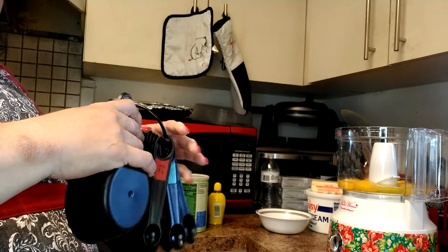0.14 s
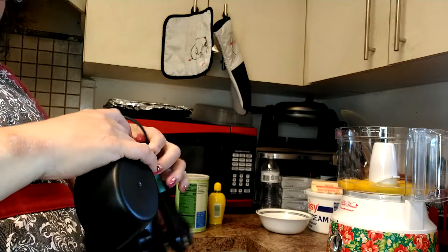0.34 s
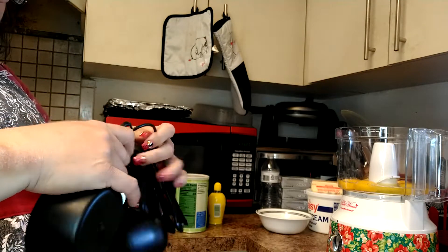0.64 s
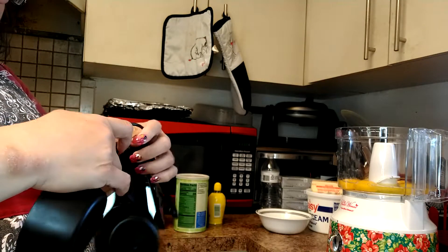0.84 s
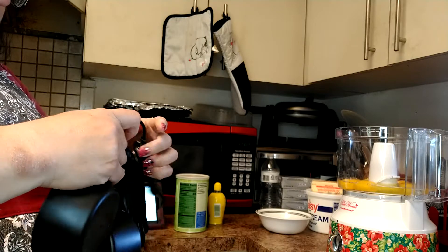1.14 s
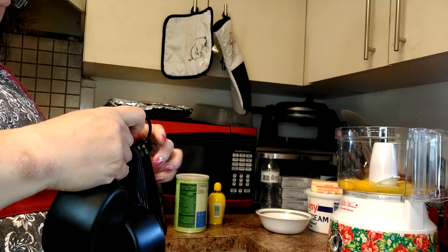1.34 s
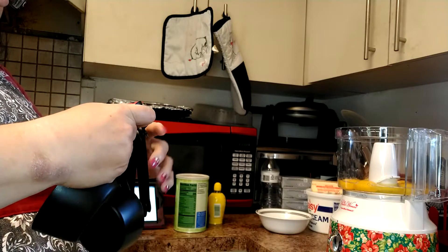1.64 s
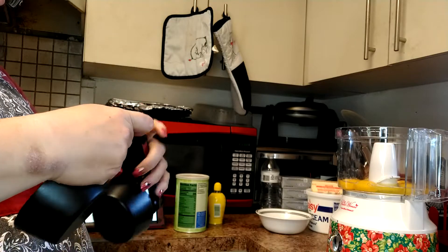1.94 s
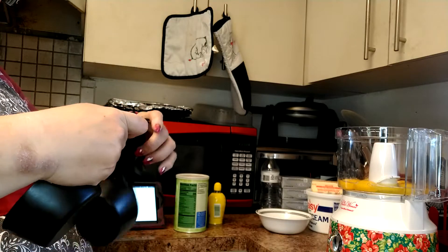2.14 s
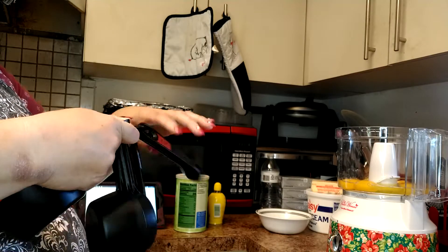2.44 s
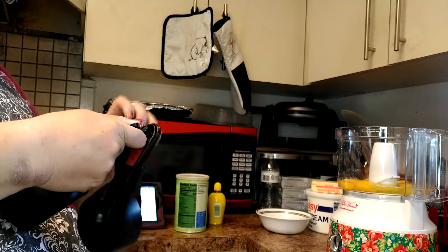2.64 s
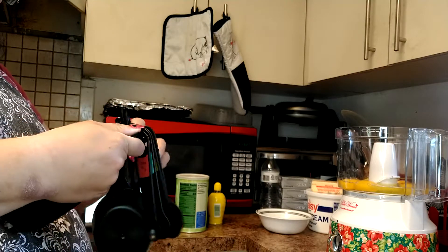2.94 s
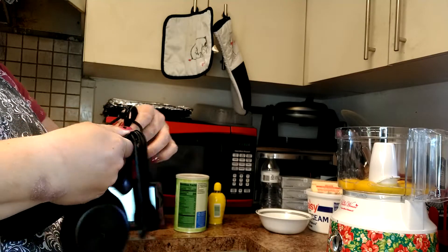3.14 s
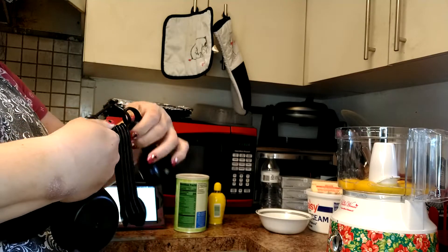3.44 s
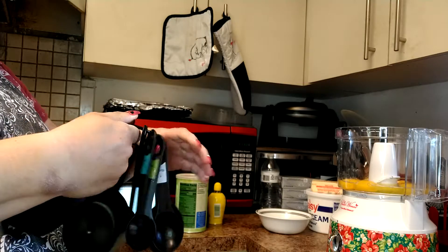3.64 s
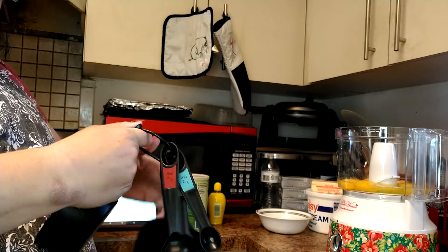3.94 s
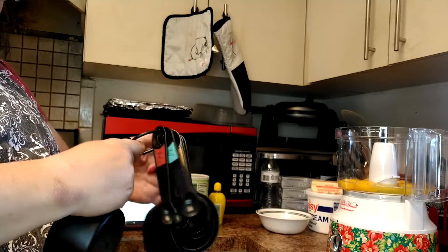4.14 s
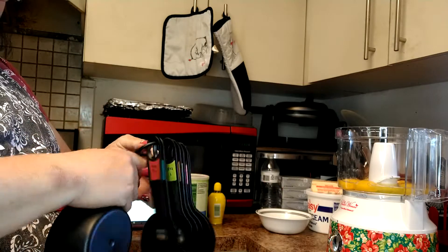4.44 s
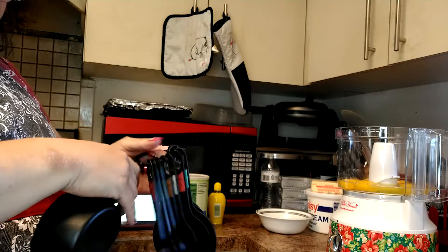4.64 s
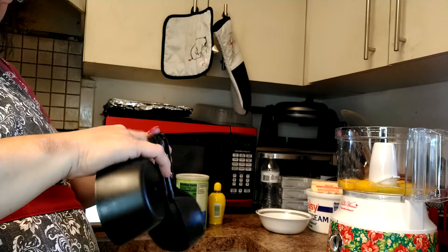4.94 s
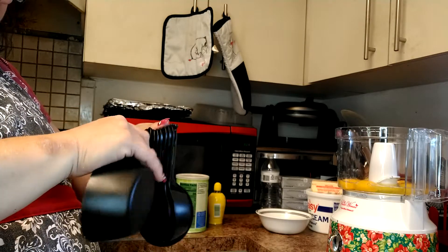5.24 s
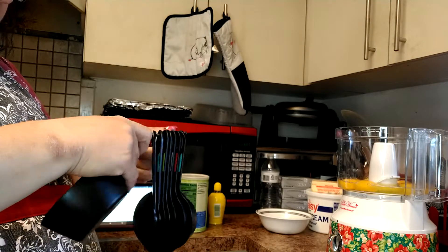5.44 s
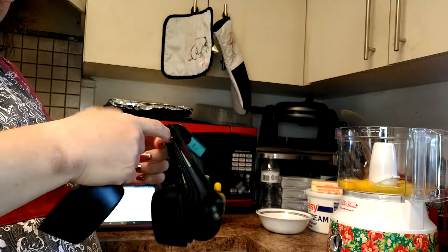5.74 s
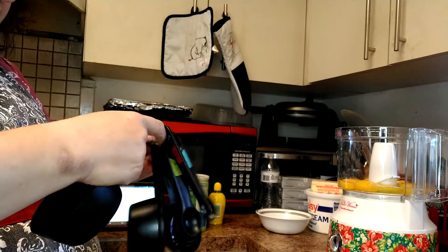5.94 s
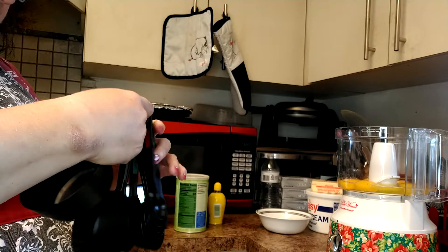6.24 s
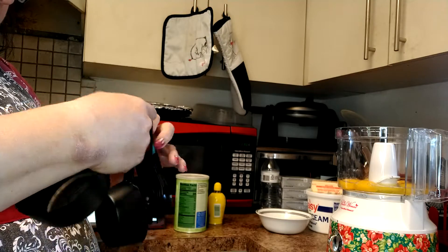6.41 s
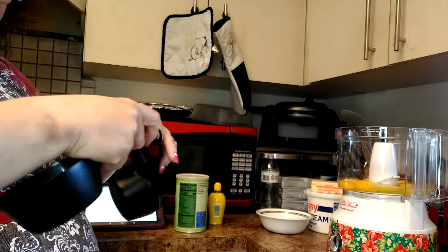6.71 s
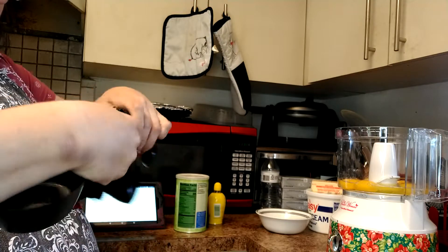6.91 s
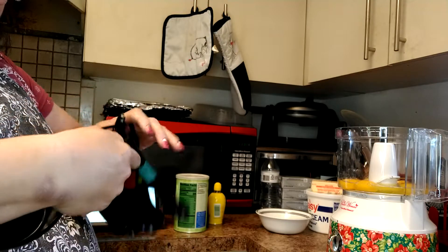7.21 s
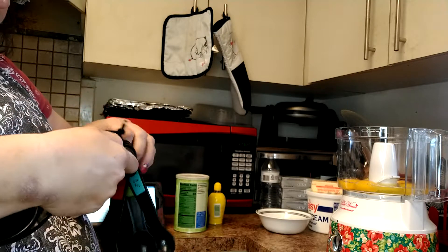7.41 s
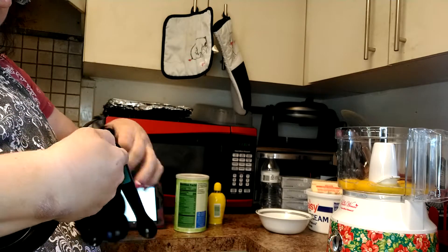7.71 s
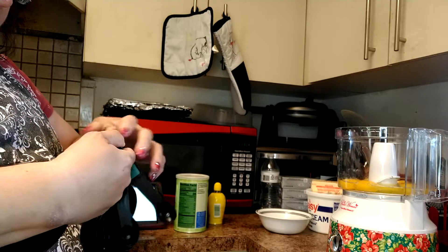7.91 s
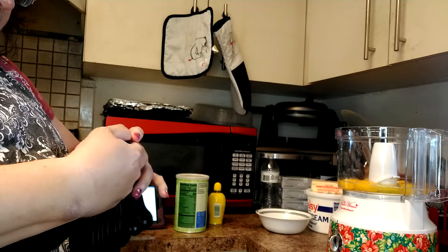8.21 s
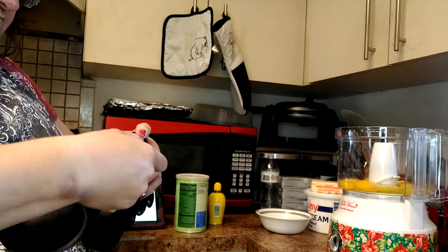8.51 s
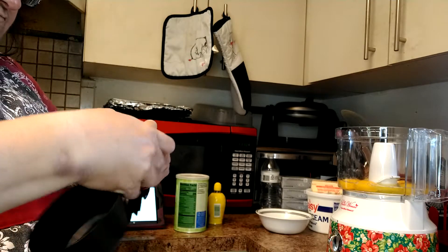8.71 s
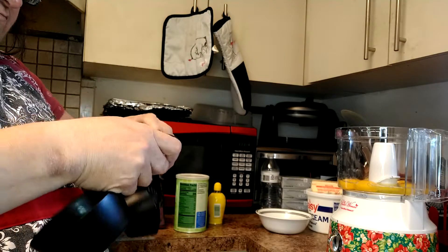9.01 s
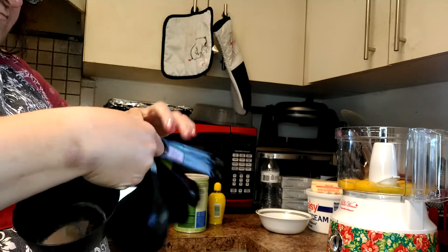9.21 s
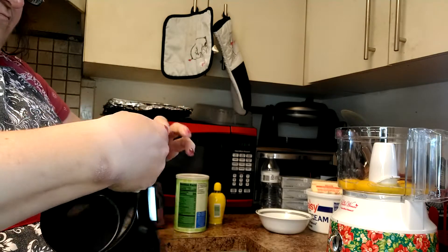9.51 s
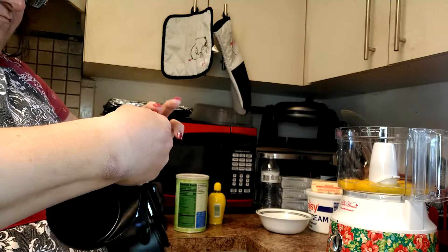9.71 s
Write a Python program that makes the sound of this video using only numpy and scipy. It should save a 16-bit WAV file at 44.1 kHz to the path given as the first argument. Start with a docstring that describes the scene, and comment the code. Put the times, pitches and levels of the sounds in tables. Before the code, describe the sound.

Close to a stereo microphone in a hard kitchen, hands sort a bunch of plastic measuring cups and spoons. Hollow cup knocks and bright handle ticks begin at once, thin out, then thicken into busy clattering. After some sparse, soft touches comes a sharp final flurry. Each blow is short and dry, followed by tiny chatter and close reflections, above quiet room hush and faint distant rumble.

```python
"""Close by, a bunch of plastic measuring cups and spoons on a ring is turned over by hand above a counter.
Bowls knock hollowly, handles and spoons tick: each blow rings short plastic modes and leaves its neighbours
chattering, and random small touches rattle between as the hands move. The hard kitchen answers with near echoes
and a short noise tail. Below lie the room's hush, banded noise, a low rumble from far off that swells and
fades, and a broad low roar, partly from the handling."""
import sys
import numpy as np
from scipy import signal
from scipy.io import wavfile

SR = 44100
rng = np.random.default_rng(int(sys.argv[2]) if len(sys.argv) > 2 else 0)


def persist_wave(psi):
    """Save psi, clipped to +-1, as 16-bit WAV."""
    counts = np.round(np.clip(psi, -1, 1) * 32767).astype(np.int16)
    wavfile.write(sys.argv[1], SR, np.atleast_2d(counts).T)


N = 434826


def cups():
    """All blows on the bunch; things this small and light send out no bass."""
    # Bowl against bowl. Each row: start in seconds, level in dB, centre of the ring in Hz,
    # share of the biggest cup in dB against the knock.
    bowl_knocks = [(0.0024, -26.5, 1680, -7.5), (0.0259, -26.5, 1650, -2.5), (0.1331, -41, 2100, -11),
                   (0.307, -47, 1340, -14), (0.382, -37.5, 1480, -5), (0.4635, -36.5, 1410, -15),
                   (0.4798, -22.5, 1490, -13.5), (0.5291, -23, 1640, -22), (0.7212, -50, 1414, -12),
                   (0.7606, -35.5, 2190, -20), (0.887, -33.5, 1340, -31), (0.9202, -33.5, 1510, -6.5),
                   (1.024, -33.5, 1540, -29), (1.0986, -45, 1600, -9), (1.1712, -42, 1430, -16),
                   (1.2389, -27, 1560, -13), (1.4757, -39, 1530, -6.5), (1.8144, -32, 1560, -25),
                   (1.8597, -32.5, 1460, -10), (2.224, -25, 1960, -25), (2.3057, -28.5, 1990, -17),
                   (2.3323, -12.5, 1490, -13), (2.4777, -22.5, 1770, -23), (2.5715, -25, 1410, -17.5),
                   (2.6467, -37.5, 1490, -21), (2.7064, -41, 1680, -30), (2.773, -16, 1370, -13),
                   (2.8337, -27, 1610, -10.5), (2.9454, -29, 1760, -18.5), (2.9866, -30, 1440, -19),
                   (3.0063, -23.5, 1400, -11), (3.0334, -23.5, 1380, -16), (3.1497, -30, 1480, -14),
                   (3.3395, -34, 1850, -20), (3.3718, -34, 1420, -21), (3.6311, -39.5, 1990, -29),
                   (3.6611, -28, 1880, -25), (3.702, -27, 2280, -23), (3.7251, -24, 1850, -33),
                   (3.7648, -18, 1830, -44), (3.7924, -16, 1700, -35), (3.902, -26.5, 1500, -27),
                   (3.915, -18, 1880, -33), (3.992, -31.5, 1340, -14), (4.0412, -15, 1460, -20.5),
                   (4.0658, -33, 1510, -38), (4.0953, -32, 1310, -17), (4.1189, -30, 1490, -7.5),
                   (4.1944, -28, 1510, -6), (4.2168, -20.5, 1450, -13), (4.2382, -13, 1500, -18.5),
                   (4.391, -30.5, 1520, -21), (4.437, -27, 1490, -13), (4.5153, -38, 1430, -2),
                   (4.556, -32, 1410, -19), (4.68, -30.5, 1700, -9), (4.7175, -33.5, 1570, -16),
                   (4.7672, -31, 1520, -15), (4.8004, -22.5, 1500, -16), (4.8247, -27, 1720, -31),
                   (4.8442, -14, 1830, -20), (4.9142, -37, 1530, -7), (4.992, -23.5, 1780, -21.5),
                   (5.0378, -34.5, 1810, -25), (5.0805, -23, 1770, -32), (5.1615, -16, 1580, -19),
                   (5.2257, -25, 1660, -44), (5.2826, -23.5, 1640, -31), (5.3312, -27, 1640, -13.5),
                   (5.448, -30, 1580, -24), (5.5024, -33, 1580, -21), (5.5428, -31.5, 1730, -22),
                   (5.5874, -33.5, 1550, -31), (5.687, -26, 1580, -21), (5.7342, -26.5, 1590, -23),
                   (5.7718, -35, 1630, -27), (6.066, -39, 1640, -22), (6.2096, -35.5, 1850, -27),
                   (6.2749, -35, 1880, -32), (6.2951, -26.5, 1850, -24.5), (6.413, -27, 1690, -20.5),
                   (6.6574, -35, 1670, -30), (6.7543, -23.5, 1714, -40), (6.9238, -37.5, 1350, -26),
                   (6.987, -34.5, 1340, -33), (7.0935, -33, 1600, -16.5), (7.212, -32, 1830, -29),
                   (7.226, -29.5, 1830, -29), (7.3081, -27.5, 1800, -22), (7.3206, -27, 1880, -30),
                   (7.3547, -21, 1820, -44), (7.386, -16.5, 1930, -43), (7.465, -8.5, 1680, -47),
                   (7.6986, -42, 1280, -30), (7.805, -18.5, 1360, -25), (7.811, -17.5, 1330, -23),
                   (7.8548, -25.5, 1730, -30), (7.9562, -43, 1270, -5), (8.0285, -29, 1700, -10.5),
                   (8.1293, -37, 1836, -13), (8.29, -48.5, 1430, -23), (9.2282, -42, 1570, -24.5),
                   (9.2978, -33, 1670, -26), (9.3797, -27.5, 1460, -19), (9.4145, -30, 2010, -15),
                   (9.437, -23.5, 2230, -14.5), (9.5277, -17, 1847, -17), (9.635, -26.5, 2080, -19),
                   (9.701, -28.5, 1220, -16)]
    # Handles and spoons. Each row: start in seconds, level in dB, centre of the ring in Hz,
    # breadth of the ring in octaves, room against direct sound in dB.
    handle_ticks = [(0.002, -25, 5540, 0.6, -1.5), (0.028, -21, 6100, 0.13, -6),
                    (0.1249, -17, 7400, 0.21, -10.5), (0.134, -21.5, 6000, 1, -9),
                    (0.3296, -36, 4740, 0.89, -2.5), (0.3539, -37, 6670, 0.5, -3),
                    (0.3828, -24, 5500, 0.44, 1), (0.4276, -17.5, 5800, 0.56, -6.5),
                    (0.4925, -25, 5230, 0.43, -9), (0.498, -24.5, 7150, 1, 4), (0.717, -41, 5230, 0.67, 1),
                    (0.727, -40, 6260, 0.37, 3), (0.759, -15.5, 5240, 0.4, -1.5),
                    (1.0257, -33.5, 4800, 0.49, 0.5), (1.098, -24, 5100, 0.18, -16),
                    (1.106, -31, 4730, 0.1, -5), (1.173, -35.5, 5030, 0.28, -5),
                    (1.244, -31, 5440, 0.6, -3), (1.253, -28, 4940, 0.17, -2),
                    (1.3066, -28.5, 6300, 0.56, -2), (1.5658, -24.5, 6060, 0.26, -1),
                    (1.571, -35, 6410, 0.25, 5), (1.6007, -26, 6050, 0.095, -6),
                    (1.8158, -27, 5300, 0.54, -4), (1.858, -35.5, 4960, 0.64, 11.5),
                    (1.864, -19.5, 4760, 0.63, -7.5), (2.0641, -33, 5000, 0.86, -2),
                    (2.105, -34, 3960, 0.3, 4), (2.1793, -29.5, 5450, 0.44, 1),
                    (2.2223, -18, 6400, 0.6, 0.5), (2.298, -28.5, 7180, 1, 3.5), (2.33, -28, 5250, 0.29, 1),
                    (2.521, -22.5, 6500, 0.41, -1), (2.5953, -38, 7990, 0.35, -16),
                    (2.612, -20, 5900, 0.13, -22), (2.643, -34, 7940, 0.4, -2),
                    (2.673, -24, 8300, 0.26, -5.5), (2.6835, -47, 8550, 0.32, -43),
                    (2.6945, -5, 8800, 0.51, -1.5), (2.7052, -3, 6900, 0.7, -15),
                    (2.773, -5, 6050, 0.88, -5.5), (2.9433, -38, 3520, 0.55, -2),
                    (2.985, -26, 4800, 0.93, -2), (3.0197, -18.5, 6000, 0.084, -6.5),
                    (3.0388, -19, 6500, 0.29, -20), (3.1587, -43.5, 3030, 0.27, 2),
                    (3.2675, -28.5, 5700, 1, 0), (3.2841, -20, 5600, 0.84, -2.5),
                    (3.372, -32.5, 4000, 1, -6.5), (3.5605, -39.5, 5930, 0.24, -4),
                    (3.583, -36, 7000, 0.64, -6), (3.597, -31, 7750, 0.77, -3), (3.6313, -35, 4900, 1, 1.5),
                    (3.6626, -28, 4540, 0.28, 1.5), (3.6705, -18, 9400, 0.35, -4.5),
                    (3.692, -14.5, 7940, 0.99, -2), (3.7033, -7.5, 3820, 0.14, -14),
                    (3.7257, -11.5, 5400, 0.74, -5), (3.745, -13, 4800, 0.61, -10),
                    (3.7552, -11.5, 7600, 0.69, -3), (3.771, -6, 3830, 0.2, -12),
                    (3.7935, -15, 4030, 0.66, 1), (3.824, -12, 4100, 0.21, -20),
                    (3.843, -8, 4800, 0.59, -6.5), (3.9144, -27, 3150, 0.26, -13),
                    (3.932, -13.5, 3620, 0.45, -11.5), (3.9836, -36, 3390, 0.22, -11),
                    (3.995, -27, 3520, 0.21, -12), (4.0097, -21, 5160, 0.64, -4.5),
                    (4.0253, -7.5, 6700, 0.4, -18), (4.034, -22.5, 6840, 0.57, 6.5),
                    (4.0432, -13.5, 2700, 0.14, -5.5), (4.0972, -15, 4570, 1, -29),
                    (4.1051, -14.5, 3530, 0.53, -17), (4.1767, -31, 3860, 0.24, -21),
                    (4.1928, -30, 5680, 0.96, 3), (4.216, -11.5, 4760, 0.87, -4.5),
                    (4.2832, -16, 5260, 1, 1.5), (4.299, -6.5, 4830, 0.14, -21),
                    (4.3612, -16, 4940, 0.14, -17), (4.412, -23, 7720, 0.37, -13), (4.437, -23, 5940, 1, 2),
                    (4.516, -27, 8990, 1, -1.5), (4.573, -40, 5810, 0.35, -16),
                    (4.5912, -38, 4130, 0.78, -5.5), (4.677, -19, 7140, 0.81, -7),
                    (4.698, -19, 7040, 0.46, -8.5), (4.716, -26, 4670, 0.6, -4.5),
                    (4.7463, -27, 3750, 0.69, -10), (4.766, -23, 5600, 0.81, -1),
                    (4.7778, -25.5, 5040, 0.85, 6), (4.7997, -13, 6640, 0.72, -3.5),
                    (4.8448, -13.5, 6000, 1, -7), (4.8987, -17, 6600, 0.23, -6.5),
                    (4.9938, -28, 6100, 0.99, 1.5), (5.0374, -11.5, 6860, 0.24, -15),
                    (5.148, -34, 4770, 0.97, 3), (5.1625, -29, 3270, 0.25, -9),
                    (5.227, -33, 3300, 0.32, -2), (5.245, -20, 5350, 0.6, -5.5),
                    (5.2588, -23, 5900, 0.61, 0.5), (5.333, -25, 5960, 1, -2.5),
                    (5.3491, -20, 4270, 1, -11.5), (5.493, -32, 4900, 1, -13), (5.567, -39, 4150, 0.84, -6),
                    (5.589, -23, 5050, 0.65, -8.5), (5.6559, -35, 4690, 0.26, -10),
                    (5.787, -40.5, 4740, 0.97, -2), (5.826, -40.5, 3340, 0.4, -7.5),
                    (5.893, -36.5, 4580, 0.26, -10), (5.9659, -44, 5500, 0.24, -4),
                    (5.9745, -30, 4260, 0.25, -11.5), (6.0261, -26, 4710, 0.42, -10.5),
                    (6.0673, -33, 5130, 0.65, -4.5), (6.107, -40, 3820, 0.37, -6),
                    (6.1194, -29, 3900, 0.21, -10), (6.148, -28, 4760, 0.44, -6),
                    (6.1528, -30.5, 4800, 0.79, -12), (6.27, -17.5, 5190, 0.066, -3.5),
                    (6.3132, -26, 4790, 0.42, -4), (6.3325, -25, 3910, 0.92, -11),
                    (6.3805, -22, 6470, 0.79, 0), (6.558, -26, 4620, 0.53, -15),
                    (6.565, -32.5, 3950, 0.68, 0.5), (6.6524, -33, 3380, 0.15, -2),
                    (6.6652, -32, 3150, 0.51, -13), (6.752, -54, 7040, 0.47, -10),
                    (6.7768, -16.5, 5600, 0.68, -4), (6.8717, -47, 6300, 0.21, -11),
                    (6.9887, -25.5, 4500, 1, -3.5), (7.1517, -36, 6100, 0.56, 6.5),
                    (7.1797, -29.5, 6300, 0.7, 0), (7.2322, -19.5, 5060, 0.07, -2),
                    (7.2826, -15, 6700, 0.48, -1.5), (7.3544, -18.5, 6500, 0.31, -2.5),
                    (7.386, -3.5, 4670, 0.49, -7.5), (7.4656, -9.5, 4600, 0.91, -3.5),
                    (7.4775, -21, 4900, 0.69, -21), (7.676, -49, 5540, 0.33, 1),
                    (7.7005, -34, 4680, 0.69, -6), (7.731, -46, 5320, 0.61, 5),
                    (7.7478, -33, 6700, 0.24, -3), (7.798, -22.5, 6400, 1, 0),
                    (7.8089, -11, 6400, 0.78, -3.5), (8.017, -30.5, 6760, 0.23, 3.5),
                    (8.027, -22.5, 7470, 0.98, -24), (8.132, -23.5, 6710, 1, -5.5),
                    (8.2963, -35.5, 7260, 0.92, -6.5), (8.3668, -37, 7850, 0.92, -1.5),
                    (8.4177, -36, 7180, 0.16, -7), (8.4359, -28.5, 6370, 0.51, -8),
                    (8.8002, -35, 7170, 0.71, -14), (9.107, -50, 5320, 0.8, -4.5),
                    (9.2189, -40, 6800, 0.84, 5.5), (9.268, -33, 7250, 0.55, -0.5),
                    (9.2879, -24, 7100, 0.64, -0.5), (9.369, -19, 7560, 0.4, -1.5),
                    (9.411, -10, 6270, 0.62, -7), (9.4373, -5, 5600, 0.72, -2), (9.46, -7, 4700, 0.51, -7),
                    (9.4718, -4, 3650, 0.11, -2.5), (9.5288, -4.5, 4100, 0.16, -11.5),
                    (9.5726, -8.5, 3750, 0.094, -11), (9.6471, -25.5, 4380, 0.91, 5.5),
                    (9.6555, -16, 4200, 0.33, -8.5), (9.702, -9, 8350, 0.6, -12),
                    (9.734, -22, 6000, 0.36, -3), (9.845, -31, 6000, 0.63, 1)]
    # How briskly the hands move the bunch, as the level of its small touches.
    # Each row: time in seconds, level among the bowls in dB, level among the handles in dB.
    hand_motion = [(0, -20.5, -23), (.16, -69, -56), (.29, -63, -65), (.5, -53, -28), (.69, -55, -69),
                   (.86, -45, -33.5), (1.01, -61, -74), (1.08, -46, -32.5), (1.16, -71, -70),
                   (1.43, -66, -60.5), (2.03, -65.5, -57.5), (2.39, -42.5, -34), (2.909, -32.5, -51.5),
                   (3.04, -33, -44), (3.13, -66, -66), (3.499, -67, -73), (3.799, -36.5, -50),
                   (4.63, -51.5, -55), (4.9, -35.5, -41.5), (5.4, -54, -68), (5.9, -54, -81),
                   (6.48, -54, -50.5), (6.78, -41, -33.5), (6.9, -47, -42), (7.1, -50, -58),
                   (7.41, -44, -37), (7.66, -56, -53), (8.051, -39.5, -49.5), (8.249, -67, -64.5),
                   (9.17, -61.5, -61), (9.5, -21, -25.5), (9.72, -57, -42), (9.86, -67, -60)]
    # Chatter of the neighbours, first bowls, then handles.
    # Each row: level against the blow in dB, time to sink by 20 dB in seconds.
    chatter_after = [(-11.5, 0.15), (-11, 0.0938)]
    # Small touches, first bowls, then handles. Each row: touches per second, spread of size in dB,
    # centre in Hz, scatter of the centre in octaves, level offset in dB.
    touch_kinds = [(120.05, 4.5, 1665, 0.32, -11.5), (405.3, 3.5, 6500, 0.74, -9.5)]
    knock_octaves, knock_room_db = 0.13, -5.5   # breadth of the part woken; room against direct
    big_cup_hz, big_cup_octaves, thin_hz = 929, 0.15, 547

    s, level_db, centre_hz, big_db = np.transpose(bowl_knocks)
    same = np.ones_like(s)
    room_db = knock_room_db * same
    knocks = np.transpose([s, level_db, centre_hz, knock_octaves * same, room_db])
    big_cup = np.transpose([s, level_db + big_db, big_cup_hz * same, big_cup_octaves * same, room_db])
    ticks = np.array(handle_ticks)
    small = []
    for blows, handling_db, after, kind in zip([knocks, ticks], in_time(hand_motion), chatter_after, touch_kinds):
        level_in_room_db = blows[:, 1] + blows[:, 4]
        small.append(touches(rattle(blows[:, 0], level_in_room_db, handling_db, *after), *kind))
    ringing = strike(*np.vstack([knocks, big_cup, ticks] + small).T)
    return signal.sosfilt(signal.butter(2, thin_hz, "high", fs=SR, output="sos"), ringing)


def strike(s, level_db, centre_hz, octaves, room_db, scatter_db=3.5, far_db=-18, build_up=10.3):
    """Each blow wakes the modes near its centre, the far higher ones faintly.

    Returns two rows: toward the microphone, into the room.
    """
    # Modes of the bunch. Each row: frequency in Hz, relative level in dB, time to fall by 60 dB in seconds.
    plastic_modes = [(782, 2, 0.016), (857, -5, 0.033), (958, 0.5, 0.025), (1312, -1.5, 0.029),
                     (1410, -5, 0.03), (1497, -4.5, 0.032), (1604, -2, 0.035), (1691, -4.5, 0.032),
                     (1783, -4.5, 0.03), (1886, 0.5, 0.017), (1945, -2.5, 0.019), (2200, 6, 0.0085),
                     (2650, 5.5, 0.0068), (2908, 0, 0.013), (3246, 4.5, 0.0078), (3547, -4, 0.011),
                     (4006, 1.5, 0.0035), (4246, -6, 0.01), (4750, 7.5, 0.0034), (5290, 1, 0.0055),
                     (5850, 4.5, 0.0041), (6494, 9.5, 0.0028), (7100, 5.5, 0.0031), (7830, -2, 0.0062),
                     (8670, 11, 0.0024), (9410, -2, 0.0054), (10150, 2.5, 0.002), (11550, -2.5, 0.0029),
                     (12490, -2, 0.0057), (13500, -3.5, .0018), (14400, -4.5, .0016), (15400, -5, .0016)]
    at = np.clip(np.round(s * SR).astype(int), 0, N - 1)
    hz, mode_db, t60 = np.transpose(plastic_modes)

    apart = np.log2(hz / centre_hz[:, None])   # octaves from the centre of the blow
    near = np.exp(-.5 * (apart / np.maximum(octaves, .08)[:, None]) ** 2)
    far = from_db(far_db - 2 * apart) * (apart > 0)
    chance = rng.standard_normal((len(at), 2, len(hz)))
    woken = (near + far) * from_db(scatter_db * chance[:, 0]) * np.sign(chance[:, 1])
    share = woken / np.sqrt(np.sum(woken ** 2, axis=1, keepdims=True))
    strength = share * from_db(level_db[:, None] + mode_db)
    direct_and_room = from_db(room_db[:, None] * [0, 1])

    out = np.zeros((2, N))
    for k in range(len(hz)):
        clicks = np.full((2, N), 1e-18)
        np.add.at(clicks.T, at, strength[:, k, None] * direct_and_room)
        r = from_db(-60 / (max(t60[k], .001) * SR))
        w = 2 * np.pi * hz[k] / SR
        # plastic yields: a broader resonance first lets the ring swell over a few cycles
        q = r ** build_up
        poles = np.convolve([1, -2 * r * np.cos(w), r * r], [1, -2 * q * np.cos(w), q * q])
        # these zeros thin both ends of the spectrum
        zeros = np.multiply((1 - q * q) / 4, [0.91, 0.0333, -1.977, 0.035, 0.91])
        out += signal.lfilter(zeros, poles, clicks)
    return out


def touches(level_db, per_s, spread_db, centre_hz, octaves, offset_db):
    """Rows of small random blows, mostly faint, each waking its own part of the bunch."""
    at = np.flatnonzero(rng.random(N) < per_s / SR)
    size = np.minimum(rng.exponential(1, len(at)), 3)
    place = np.clip(rng.standard_normal(len(at)), -1, 2)
    room_db = 2.8 * rng.standard_normal(len(at))
    touch_db = level_db[at] + offset_db + spread_db * size
    breadth = np.full(len(at), .5 * octaves)
    return np.transpose([at / SR, touch_db, centre_hz * 2 ** (octaves * place), breadth, room_db])


def rattle(s, level_db, handling_db, below_db, settle_s):
    """Level of the small touches: the hands' motion plus the chatter after each blow, which dies ever faster."""
    rise_s = 0.015
    t = np.arange(SR // 4) / SR
    blow_power = np.zeros(N)
    np.add.at(blow_power, np.clip((s * SR).astype(int), 0, N - 1), from_db(level_db + below_db) ** 2)
    shape = (1 - np.exp(-t / rise_s)) * from_db(-20 * (t / settle_s) ** 2) ** 2
    chatter_power = np.abs(signal.fftconvolve(blow_power, shape)[:N])
    return 10 * np.log10(chatter_power + from_db(handling_db) ** 2)


def kitchen(direct, sent, count=5):
    """The direct sound reaches the right channel first; as the bunch swings, a few places answer in turn."""
    left_lag_s, left_db, swing_s = .00005, 1.7, .04   # swing_s: step from one place to the next
    place = np.arange(N) / (swing_s * SR)
    shares = [np.maximum(1 - np.abs((place - k) % count - 1), 0) for k in range(count)]
    scale = np.sqrt(sum(share ** 2 for share in shares))   # constant power through the crossfades
    room = 0
    for share in shares:
        room = room + signal.fftconvolve([sent * share / scale], response(), axes=1)[:, :N]
    heard_direct = np.array([np.roll(direct, round(left_lag_s * SR)), direct])
    return from_db([[left_db], [0]]) * (room + heard_direct)


def response():
    """A few near echoes and a diffuse tail that dies band by band, unlike at left and right."""
    # Decay of the tail. Each row: frequency in Hz, time to fall by 60 dB in seconds.
    tail_t60 = [(600, 0.26), (1500, 0.21), (3000, 0.21), (6000, 0.17), (12000, 0.14), (16000, .14)]
    # Counter and cupboards. Each row: nominal delay in seconds, left level in dB, right level in dB.
    near_echoes = [(.0035, -2, -14.5), (.007, -6, 1), (.014, -7.5, -0.5)]
    tail_db, rise_s = 7.5, 0.003
    t = np.arange(SR // 2) / SR
    edges = 200 * 2 ** np.arange(0, 6.6, .5)
    white = rng.standard_normal((2, len(t)))
    tail = 0
    for low, high in zip(edges, edges[1:]):
        tail = tail + band(white, low, high) * from_db(-60 * t / at_hz(tail_t60, low))
    tail *= 1 - np.exp(-t / rise_s)
    out = from_db(tail_db) * rms_one(tail) / np.sqrt(len(t))
    for lag, left_db, right_db in near_echoes:
        arrival = np.round(lag * SR * rng.uniform(.93, 1.07, 2)).astype(int)
        out[[0, 1], arrival] += from_db([left_db, right_db])
    return out


def hush():
    """Room hush: half-octave bands of stereo noise, each with its level and left-right likeness."""
    # Colour of the hush. Each row: frequency in Hz, relative level in dB per Hz.
    hush_colour = [(13, -44), (22, -20), (95, -9), (165, -2.5), (270, -12.5), (432, -7.5), (510, -13.5),
                   (815, -6.5), (1130, -25.5), (1340, -13), (2520, -37.5), (3510, -17.5), (5030, -23),
                   (7390, -31.5), (16000, -42.5)]
    # Each row: frequency in Hz, left-right likeness (no unit, held within 0 to 1 below).
    likeness = [(60, -0.0013), (180, 0.97), (550, 0.023), (1650, -0.13), (4970, -1.2), (15000, -0.28)]
    hush_db = -62
    edges = 22 * 2 ** np.arange(0, 9.6, .5)
    white = rng.standard_normal((2, 2, N))
    out = 0
    for k, (low, high) in enumerate(zip(edges, edges[1:])):
        centre = np.sqrt(low * high)
        mid, side = band(white[k % 2], low, high)   # neighbouring bands use separate noise
        alike = np.clip(at_hz(likeness, centre), 0, 1)
        stereo = np.sqrt(1 + alike) * mid + np.sqrt(1 - alike) * side * [[1], [-1]]
        out = out + from_db(at_hz(hush_colour, centre)) * stereo
    return from_db(hush_db) * rms_one(out)


def rumble():
    """A dull thrum and a rough drone whose pitch wanders, both from far off, and a broad roar above them,
    partly from the handling."""
    # Each row: time in seconds, drone level in dB before its left-right tilt,
    # level of the thrum near 45 Hz in dB, roar level in dB.
    rumble_levels = [(0.0, -67, -80, -50.5), (0.22, -80, -85, -70), (0.47, -67, -84, -62.5),
                     (2.17, -76, -87, -72), (2.22, -70.5, -74, -62), (5.22, -58.5, -72, -60.5),
                     (6.07, -66, -77, -66), (8.13, -68.5, -74, -61.5), (8.4, -71.5, -82.5, -78),
                     (9.28, -76.5, -77.5, -70), (9.45, -64, -78, -53), (9.75, -66, -65, -61),
                     (9.86, -80, -82, -84)]
    # Each row: time in seconds, pitch of the drone in Hz.
    drone_pitch = [(0, 149.4), (3.6, 149.2), (3.8, 139.4), (3.95, 109), (4.3, 125.8), (4.55, 106),
                   (5.4, 104), (6.2, 104), (6.5, 120), (7.6, 121), (8.0, 150.9), (9.86, 146)]
    drone_db, thrum_db, roar_db = in_time(rumble_levels)
    [drone_hz] = in_time(drone_pitch)
    turn = 2 * np.pi * np.cumsum(drone_hz) / SR
    rough_tone = slow(7) * np.cos(turn) + slow(7) * np.sin(turn)
    drone = rms_one(band(rough_tone, 97, 220)) * from_db([[1.5], [-1.5]])   # stronger at left
    thrum = rms_one(band(band(rng.standard_normal(N), 36, 69), 30, 70))
    shared, left, right = band(rng.standard_normal((3, N)), 87, 530)
    roar = rms_one(shared + 0.15 * np.array([left, right]))
    return from_db(thrum_db) * thrum + from_db(drone_db) * drone + from_db(roar_db) * roar


def from_db(db):
    """Gain of a level in dB."""
    return 10 ** (np.asarray(db) / 20)


def rms_one(x):
    """Scaled to rms 1."""
    return x / np.sqrt(np.mean(x ** 2) + 1e-20)


def in_time(rows):
    """Columns of a curve table, sample by sample."""
    s, *columns = np.transpose(rows)
    return [np.interp(np.arange(N) / SR, s, c) for c in columns]


def at_hz(points, hz):
    """A spectrum read on a log frequency axis."""
    point_hz, values = np.transpose(points)
    return np.interp(np.log(hz), np.log(point_hz), values)


def band(x, low_hz, high_hz):
    """Butterworth band-pass."""
    return signal.sosfilt(signal.butter(2, [low_hz, high_hz], "band", fs=SR, output="sos"), x)


def slow(rate):
    """Smooth random curve of rms 1: noise through a double low-pass pole at rate in Hz."""
    r = np.exp(-2 * np.pi * rate / SR)
    settled = signal.lfilter([1], [1, -2 * r, r * r], rng.standard_normal(N + SR))[SR:]
    return rms_one(settled)


def scene():
    """Cups in the kitchen over hush and rumble."""
    return kitchen(*cups()) + hush() + rumble()


def record(dry):
    """The microphone channels lift the treble, each in its own way; high peaks are rounded, the top is cut."""
    cutoff_hz = 16250   # from here up at least 60 dB down
    treble = np.array([[.1], [.5]]) * band(dry, 6500, 11000)   # left, right
    lifted = dry + treble + 0.5 * band(dry, 11300, 16000)
    rounded = lifted / (1 + (lifted / .9) ** 4) ** .25
    return signal.sosfilt(signal.cheby2(14, 60, cutoff_hz, fs=SR, output="sos"), rounded)


dry = scene()
out = record(dry)
persist_wave(out)
```